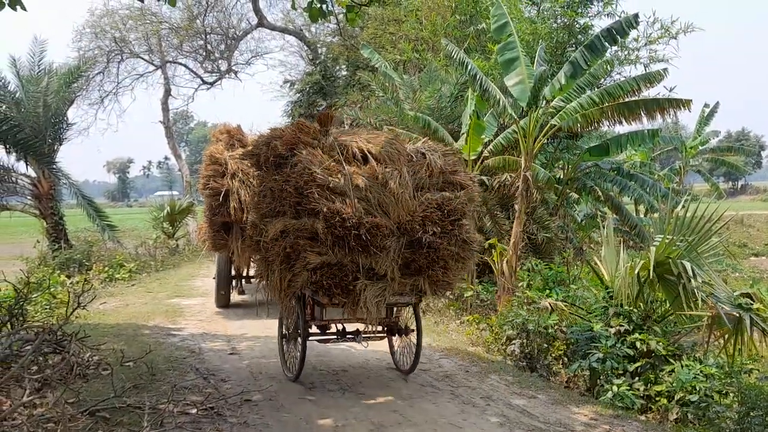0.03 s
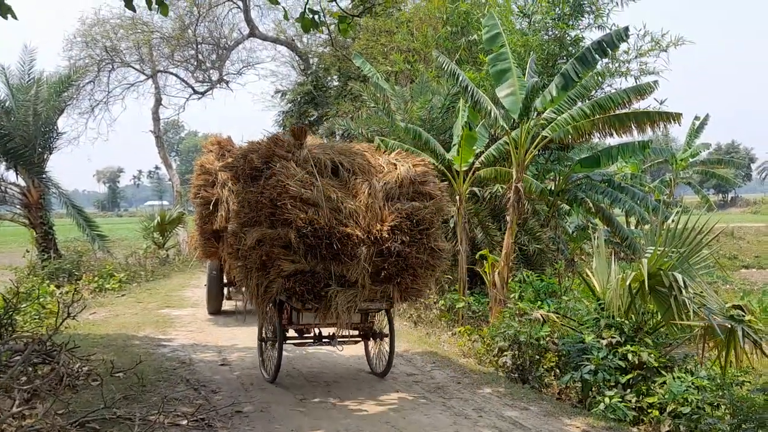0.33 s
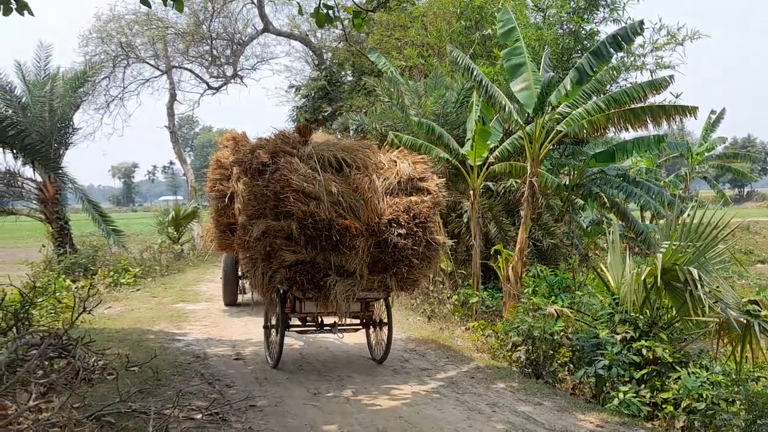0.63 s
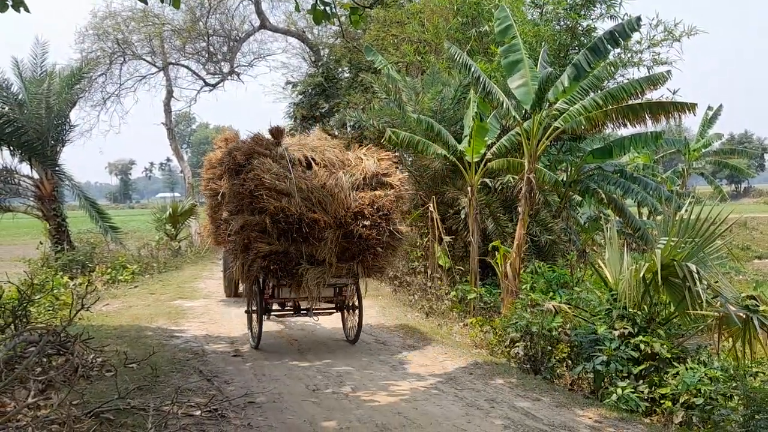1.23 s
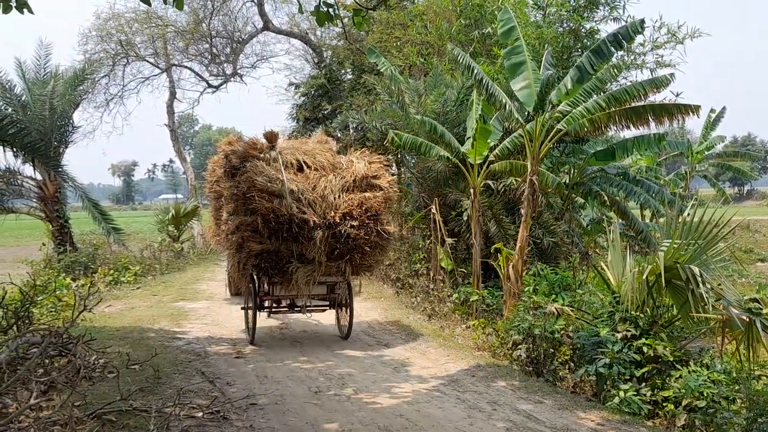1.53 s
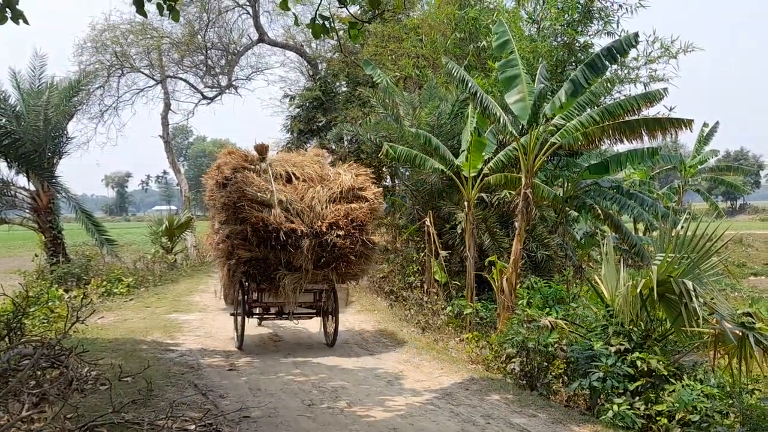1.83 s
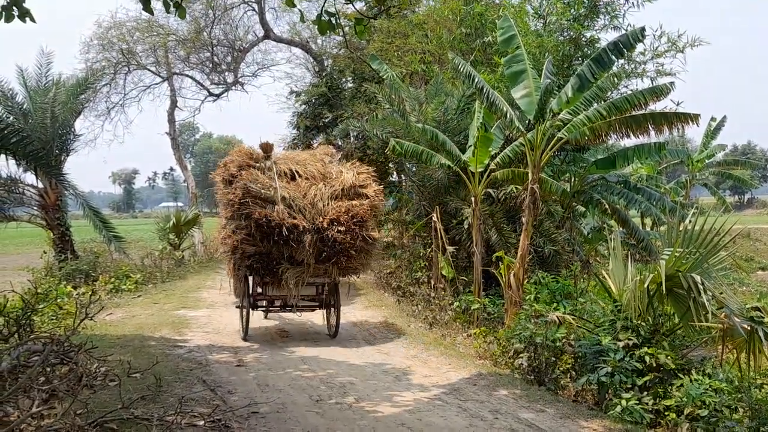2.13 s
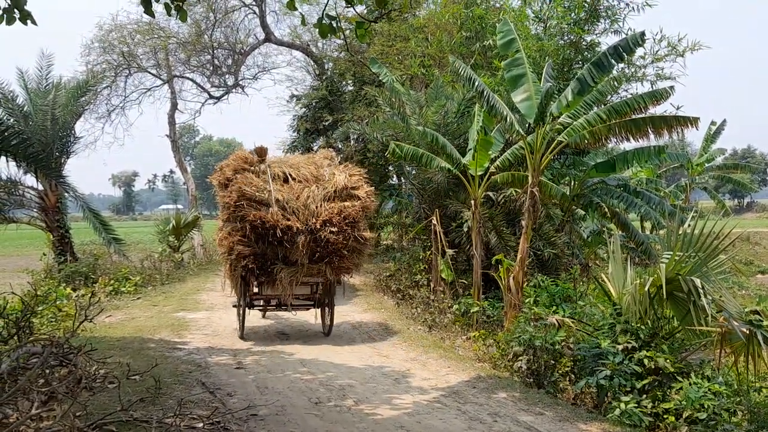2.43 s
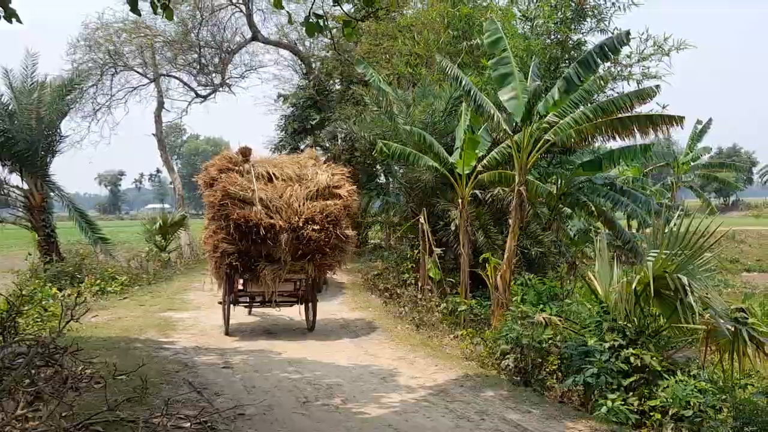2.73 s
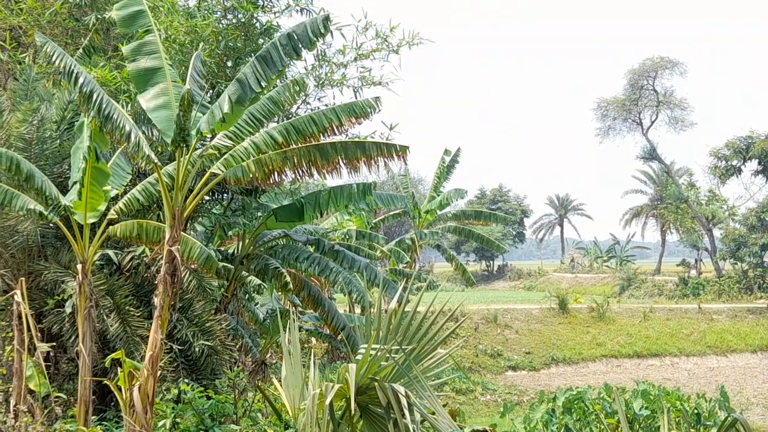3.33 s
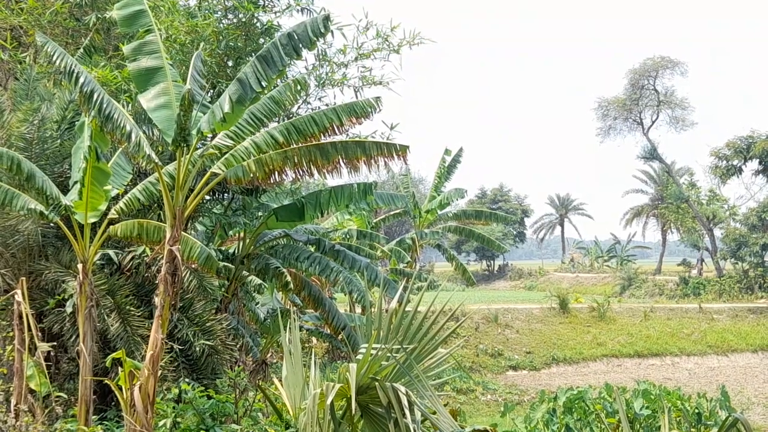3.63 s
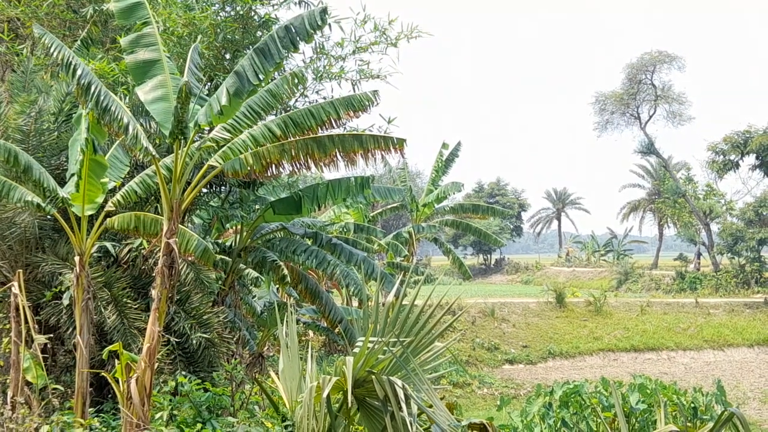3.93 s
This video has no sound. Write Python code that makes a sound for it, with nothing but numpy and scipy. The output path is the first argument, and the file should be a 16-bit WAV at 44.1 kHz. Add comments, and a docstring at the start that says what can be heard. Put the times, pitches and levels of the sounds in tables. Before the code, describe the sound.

A loaded pedal cart rattles away along a country dirt lane, tyres crunching grit and a wheel squealing at first. Wind buffets the microphone, then drops. A bird repeats short rising chirps throughout as the cart fades.

```python
"""A loaded pedal cart rolls away down a dirt lane, its frame rattling and its tyres crushing grit,
while a rubbing wheel squeals for the first second and wind buffets the left microphone.
From the first moment a bird repeats a short rising chirp in the trees; smaller birds soon join with
thin whistles. Near 2.8 s the wind drops and the level dips briefly. The cart fades, leaving the birds,
the hush of open country and a far pump engine thudding in the fields."""
import sys
import numpy as np
from scipy import signal
from scipy.fft import rfft, irfft
from scipy.io import wavfile

SR = 44100
rng = np.random.default_rng(int(sys.argv[2]) if len(sys.argv) > 2 else 0)


def output_pcm(signal):
    """Save a mono or channel-first signal as 16-bit PCM at the path in sys.argv[1].

    Samples are clipped to [-1, 1] before scaling.
    """
    pcm = np.clip(np.atleast_2d(signal).T, -1, 1) * 32767
    wavfile.write(sys.argv[1], SR, np.round(pcm).astype(np.int16))


N = 176400
T = np.arange(N) / SR


def amp(db):
    """Decibels to gain."""
    return 10 ** (np.asarray(db) / 20)


def unit(x):
    """Scales to an rms of one."""
    return x / np.sqrt(np.mean(x ** 2) + 1e-20)


def curve(rows, column=1):
    """An automation curve: one column of a table, joined by straight lines in time."""
    rows = np.array(rows)
    return np.interp(T, rows[:, 0], rows[:, column])


def pan(db):
    """Left and right gains for a level difference; negative leans right."""
    return amp(np.array([[db / 2], [-db / 2]]))


def add(mix, start_s, sound):
    """Mixes a sound in at a time."""
    part = mix[..., max(round(start_s * SR), 0):][..., :sound.shape[-1]]
    part += sound[..., :part.shape[-1]]


def colour(x, eq):
    """Minimum-phase EQ through (freq_hz, gain_db) points; white noise keeps its level."""
    freq_hz, gain_db = np.transpose(eq)
    bin_hz = abs(np.fft.fftfreq(8192, 1 / SR))
    bin_db = np.interp(np.log(bin_hz + 1), np.log(freq_hz + 1), gain_db)
    log_gain = np.log(amp(np.maximum(bin_db, -100)))
    taps = np.fft.ifft(np.exp(signal.hilbert(log_gain).conj())).real[:4096]
    return signal.oaconvolve(x, (taps / np.linalg.norm(taps))[None], axes=1)[:, :N]


def drift(rate_hz, count=N):
    """A smooth random wobble that rolls off above the given rate."""
    bin_hz = np.fft.rfftfreq(count, 1 / SR)
    return unit(irfft(rfft(rng.standard_normal(count)) * np.exp(-(bin_hz / rate_hz) ** 2), count))


def stereo(three, shared):
    """The first signal reaches both microphones, the left slightly late; the others feed one each."""
    lag_samples = 17
    common = np.array([np.roll(three[0], lag_samples), three[0]])
    return np.sqrt(shared) * common + np.sqrt(1 - shared) * three[1:]


def grains(per_s, spread_db):
    """Three trains of tiny impacts of uneven size."""
    size = amp(spread_db * np.minimum(rng.exponential(1, (3, N)), 4))
    return unit(size * rng.standard_normal((3, N)) * (rng.random((3, N)) < per_s / SR))


def blows(hits, decay_s, rise_s):
    """Envelope of a row of impacts, each a quick attack and a decay."""
    out, t = np.zeros(N), np.arange(SR // 4) / SR
    for start_s, level_db in hits:
        add(out, start_s, amp(level_db) * np.exp(-t / decay_s) * (1 - np.exp(-t / rise_s)))
    return out


def scatter(x, t60_s, rise_s, per_s):
    """Echoes from leaves and trunks, different on each side."""
    t = np.arange(SR // 2) / SR
    echoes = rng.choice([-1., 1.], (2, len(t))) * (rng.random((2, len(t))) < per_s / SR)
    envelope = amp(-60 * t / t60_s) * (1 - np.exp(-t / rise_s))
    wet = signal.fftconvolve(x[None], echoes * envelope, axes=1)
    return wet * np.linalg.norm(x) / (np.linalg.norm(wet, axis=1, keepdims=True) + 1e-12)


def cart():
    """Bumps shake the frame and its loose fittings while the tyres crush grit."""
    # surges over rough patches, fading with distance: time_s, frame_db, grit_db
    roll = [(0, -37, -55), (.115, -39.5, -47), (.13, -40, -45), (.2, -36.5, -46), (.3, -41, -53),
            (.43, -40.5, -56), (.55, -37, -55.5), (.61, -31.5, -45), (.7, -40.5, -53), (.86, -45.5, -58),
            (1.1, -50.5, -54.5), (1.16, -39.5, -59), (1.25, -42, -59.5), (1.36, -38.5, -52.5),
            (1.52, -43.5, -60), (1.61, -46, -66.5), (1.68, -39, -55), (1.8, -49, -66), (1.86, -41, -53.5),
            (1.99, -40.5, -60), (2.1, -58.5, -63.5), (2.22, -55.5, -67), (2.27, -49, -65),
            (2.46, -55, -63.5), (2.68, -51, -66), (2.88, -57, -66), (3.07, -68, -80), (3.3, -72, -78),
            (3.37, -72, -75), (3.8, -74, -82), (4, -67.5, -66.5)]
    # jolts of the cart: start_s, level_db
    jolt_hits = [(.104, -24), (.197, -28.5), (.405, -35), (.453, -34), (.596, -28), (.727, -36),
                 (1.362, -33), (1.431, -31.5), (1.51, -37), (1.85, -35), (1.934, -33.5), (2.248, -43),
                 (2.381, -46), (2.518, -38.5), (2.715, -42.5)]
    # snaps of grit and straw: start_s, level_db
    snap_hits = [(.1216, -31), (.185, -42), (.536, -37.5), (1.293, -35), (1.631, -43), (1.846, -42.5),
                 (2.772, -45.5), (3.345, -59)]
    # body resonances of the frame: freq_hz, gain_db
    frame_eq = [(150, -29), (250, -6.5), (296, -1.5), (332, -6), (372, 1.5), (423, -4), (476, 0.5),
                (539, -3.5), (722, -6.5), (812, 1.5), (1010, -12.5), (1100, -24), (1430, -22), (2420, -120)]
    # midrange clatter of the fittings: freq_hz, gain_db
    rattle_eq = [(700, -11.5), (1100, -4.5), (1900, -2), (2350, -3), (2800, -8), (4400, -6), (6000, -26),
                 (8000, -26.5), (11000, -35)]
    # bright crunch under the tyres: freq_hz, gain_db
    grit_eq = [(2500, 1.5), (4500, -0.5), (7000, 0.5), (8500, -7.5), (10500, -13.5), (12500, -7.5),
               (14200, -8.5), (15500, -16)]
    frame_db, grit_db = curve(roll, column=1), curve(roll, column=2)
    shake = amp(1.93 * drift(rate_hz=26))
    jolts = blows(jolt_hits, decay_s=0.013, rise_s=0.00042)
    frame_gain = amp(frame_db - 1.5) * shake + jolts
    rattle_gain = amp((frame_db + grit_db) / 2 + 4.5) * shake + amp(-11.5) * jolts
    snap_gain = blows(snap_hits, decay_s=0.015, rise_s=0.00057)
    frame = stereo(grains(per_s=1600, spread_db=2.5), shared=0.82) * frame_gain
    rattle = stereo(grains(per_s=3500, spread_db=1.5), shared=0.23) * rattle_gain
    grit = stereo(grains(per_s=9000, spread_db=2.0), shared=0.045) * amp(grit_db + 5.5)
    snaps = stereo(grains(per_s=9000, spread_db=2.5), shared=0.79) * snap_gain
    rolling = colour(frame, frame_eq) + colour(rattle, rattle_eq) + colour(grit, grit_eq)
    return pan(db=-3) * rolling + pan(db=-1) * colour(snaps, grit_eq)


def squeal():
    """Uneven slips of a rubbing wheel ring a few close resonances."""
    # wheel resonances: pitch_hz, width_hz, gain_db
    modes = [(1787, 106, 0), (1879, 73, 1.5), (2070, 55, -5), (2323, 240, -10)]
    # strength of the rubbing: time_s, level_db
    rub = [(0, -33.5), (.35, -35), (.65, -35), (.85, -38), (1.09, -40), (1.16, -49.5), (1.3, -94)]
    slips = stereo(grains(per_s=2500, spread_db=1.5), shared=0.43)
    bin_hz = np.fft.rfftfreq(N, 1 / SR)
    body = sum(amp(db) / (1 + 2j * (bin_hz - hz) / width) ** 2 for hz, width, db in modes)
    return pan(db=-5) * unit(irfft(rfft(slips) * body, N)) * amp(curve(rub))


def wind():
    """Lumpy buffeting, unrelated in the two microphones, with two single puffs on the left."""
    # gusts on the exposed left microphone: time_s, level_db
    left = [(0, -39), (.17, -32), (.29, -41.5), (.6, -28), (.72, -30.5), (.81, -24), (1.0, -37),
            (1.17, -24.5), (1.38, -34.5), (1.52, -41.5), (1.75, -35), (2.0, -26), (2.2, -35.5),
            (2.45, -31.5), (2.62, -44.5), (2.75, -34), (2.82, -78)]
    # gusts on the sheltered right microphone: time_s, level_db
    right = [(0, -44), (.3, -32), (.42, -44.5), (2.2, -41), (2.75, -54.5), (2.82, -69)]
    # low rumble of the buffeting: freq_hz, gain_db
    buffet_eq = [(15, -53), (40, -6.5), (65, 2), (125, -3), (200, -14), (300, -27), (1500, -71)]
    # single puffs: start_s, level_db, pitch_hz
    puffs = [(0.636, -13, 123), (0.801, -21, 108)]
    gust_db = np.array([curve(left) + 3.5 * drift(rate_hz=29.6), curve(right) + 2.9 * drift(rate_hz=13)])
    out = colour(rng.standard_normal((2, N)) * amp(gust_db - 3), buffet_eq)
    t = np.arange(SR // 10) / SR
    for start_s, level_db, pitch_hz in puffs:
        age = t * pitch_hz / 0.17  # the swell peaks a third of a cycle in
        swell = age ** 2 * np.exp(2 - age) / 2
        add(out[0], start_s, amp(level_db) * swell * np.sin(2 * np.pi * pitch_hz * t))
    return out


def field():
    """The steady hush of open country."""
    # dark bed of outdoor air: freq_hz, gain_db
    hush_eq = [(20, -18), (60, -9), (130, 0), (220, -10), (600, -26), (820, -14.5), (1200, -23),
               (4000, -26), (10000, -42), (15500, -41.5)]
    air = stereo(rng.standard_normal((3, N)), shared=0.75)
    return pan(db=-5) * amp(-59) * colour(air, hush_eq)


def pump():
    """A far single-cylinder engine: one dull thud per firing and a weaker one between."""
    start_s, firings_per_s, pitch_hz, rise_s = 0.02014, 14.25, 89.4, 0.0055
    out, t = np.zeros(N), np.arange(SR // 10) / SR
    thud = t / rise_s * np.exp(1 - t / rise_s) * np.sin(2 * np.pi * pitch_hz * t)
    for beat, jitter in enumerate(rng.standard_normal(130)):
        level_db = -48 + 2.4 * jitter - 8 * (beat % 2)
        add(out, start_s + beat / (2 * firings_per_s), amp(level_db) * thud)
    return pan(db=-0.5) * out


def chirps():
    """A bird's near-sine sweeps up about an octave, holds its top and is smeared by the foliage."""
    # the bird's calls: start_s, level_db
    calls = [(0.027, -28.5), (0.359, -30), (0.686, -30.5), (1.03, -29.5), (1.370, -28.5), (2.017, -33),
             (2.345, -31), (2.691, -32), (2.846, -31), (3.175, -36.5), (3.540, -36), (3.906, -36)]
    # the sweep that every chirp follows: time_s, pitch_hz, level_db
    sweep = [(-.005, 1840, -7), (.004, 2170, -9.5), (.010, 2750, -10), (0.014, 3360, 0.5),
             (.020, 3660, -1.5), (.026, 3980, -0.5), (.034, 4113, -4), (.046, 4210, -12), (.054, 4100, -36)]
    time_s, pitch_hz, sweep_db = np.transpose(sweep)
    out, t = np.zeros((2, N)), np.arange(0, time_s[-1], 1 / SR)
    for start_s, level_db in calls:
        waver = 1 + 0.018 * drift(rate_hz=400, count=4096)[:len(t)]
        phase = 2 * np.pi * np.cumsum(np.interp(t, time_s, pitch_hz) * waver) / SR
        tone = np.sin(phase) + amp(-38.5) * np.sin(2 * phase)
        note = amp(level_db + np.interp(t, time_s, sweep_db)) * tone
        leaves = scatter(note, t60_s=0.22, rise_s=0.00085, per_s=900)
        grove = scatter(note, t60_s=0.4, rise_s=0.028, per_s=1700)
        add(out, start_s, amp(-6) * note)
        add(out, start_s, amp(1.5) * leaves + amp(-4) * grove)
    return pan(db=-5.5) * out


def whistles():
    """Thin, wavering glides from smaller birds further off, half direct and half through the leaves."""
    # whistled notes: start_s, length_s, first_hz, middle_hz, last_hz, level_db
    notes = [(0.457, 0.026, 6710, 6700, 6500, -48), (0.822, 0.038, 4630, 4356, 3725, -43),
             (0.831, 0.015, 6680, 6950, 6800, -51), (0.859, 0.022, 5940, 5700, 5250, -51),
             (0.895, 0.049, 4310, 4190, 3620, -44), (0.925, 0.0174, 7200, 6800, 6250, -52),
             (1.241, 0.018, 5510, 5450, 4400, -44), (1.267, 0.029, 5600, 5500, 4400, -45.5),
             (1.447, 0.052, 4004, 4140, 4200, -39.5), (2.018, 0.25, 4690, 4825, 4510, -54.5),
             (2.281, 0.052, 4120, 3980, 3750, -48.5), (3.079, 0.03, 4320, 5260, 5640, -59),
             (3.112, 0.062, 5520, 5030, 4400, -58), (3.449, 0.11, 2175, 2150, 2345, -63),
             (3.747, 0.24, 1976, 2050, 2190, -63.5)]
    out = np.zeros((2, N))
    for start_s, length_s, first_hz, middle_hz, last_hz, level_db in notes:
        progress = np.linspace(0, 1, int(length_s * SR))
        glide_hz = np.polyval(np.polyfit([0, .5, 1], [first_hz, middle_hz, last_hz], 2), progress)
        waver = 1 + 0.008 * drift(rate_hz=90, count=16384)[:len(progress)]
        swell = np.sqrt(4 * progress * (1 - progress))
        note = amp(level_db - 1.5) * swell * np.sin(2 * np.pi * np.cumsum(glide_hz * waver) / SR)
        add(out, start_s, note)
        add(out, start_s, scatter(note, t60_s=0.23, rise_s=0.003, per_s=1300))
    return pan(db=-7.5) * out


def scene():
    """All sources together; the level dips briefly near 2.8 s."""
    dip_s, dip_width_s, dip_db = 2.8, 0.018, -9
    dip = amp(dip_db * np.exp(-((T - dip_s) / dip_width_s) ** 2))
    return dip * (chirps() + whistles() + cart() + squeal() + wind() + pump() + field())


def record(dry):
    """The microphones' low cut, then a steep high cut."""
    low_cut_hz, high_cut_hz = 39.6, 15750
    low_cut = signal.butter(3, low_cut_hz, "high", fs=SR, output="sos")
    high_cut = signal.firwin(511, high_cut_hz, window=("kaiser", 9), fs=SR)
    return signal.oaconvolve(signal.sosfilt(low_cut, dry), high_cut[None], "same")


dry = scene()
out = record(dry)
output_pcm(out)
```